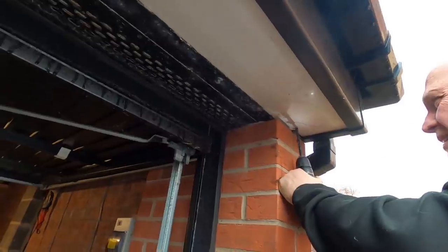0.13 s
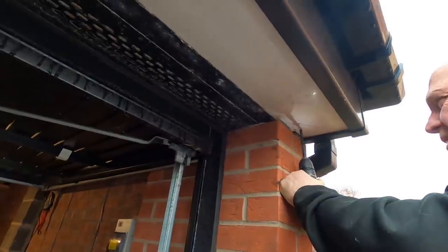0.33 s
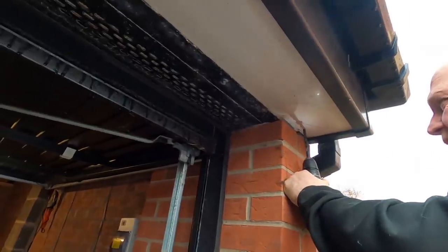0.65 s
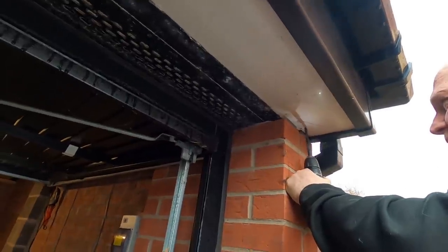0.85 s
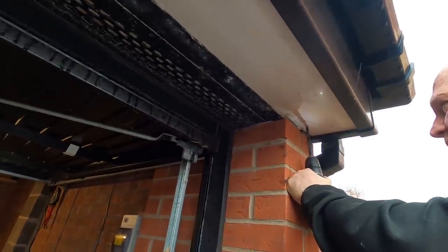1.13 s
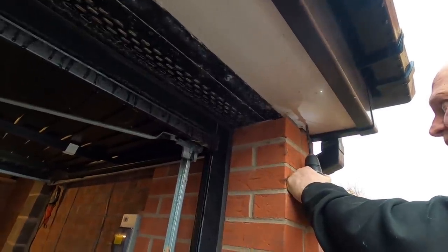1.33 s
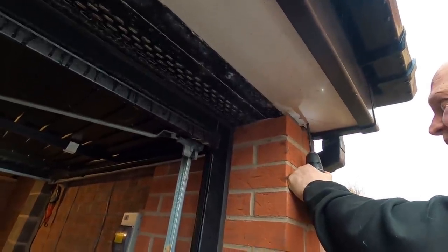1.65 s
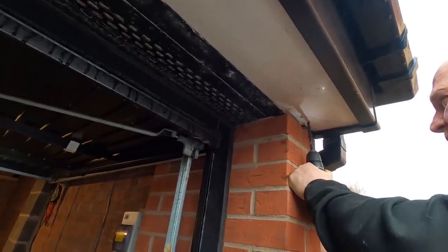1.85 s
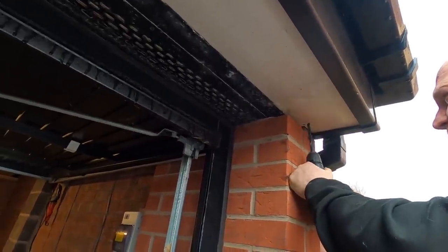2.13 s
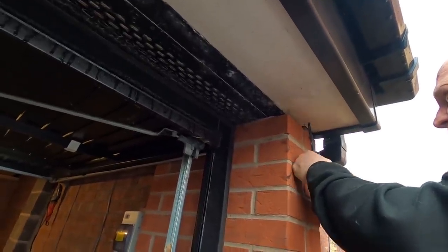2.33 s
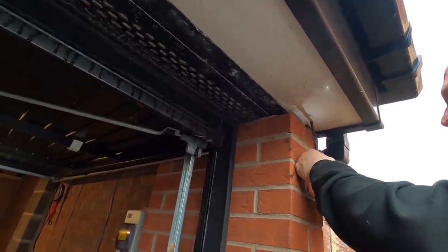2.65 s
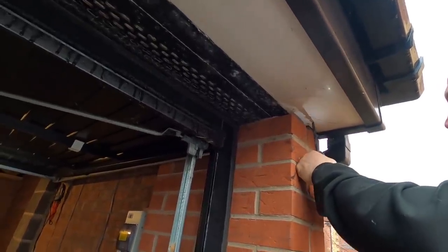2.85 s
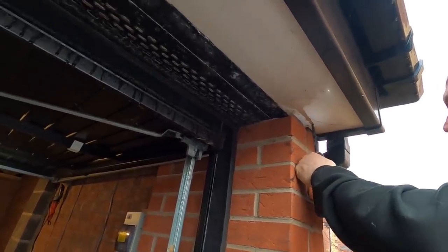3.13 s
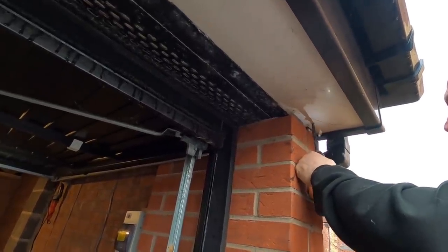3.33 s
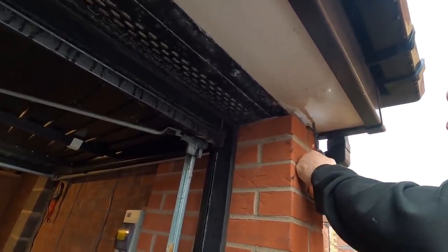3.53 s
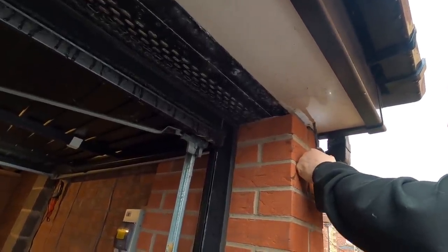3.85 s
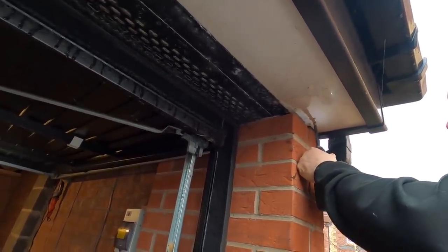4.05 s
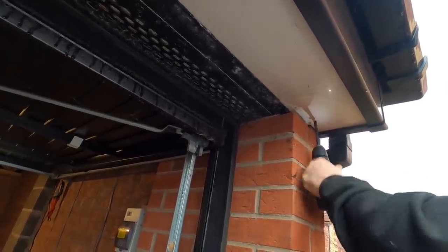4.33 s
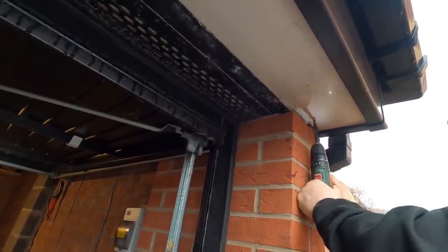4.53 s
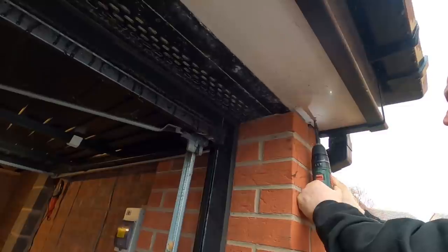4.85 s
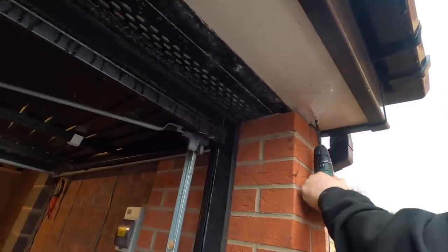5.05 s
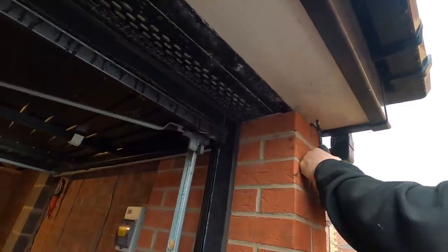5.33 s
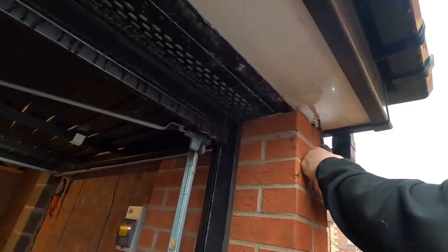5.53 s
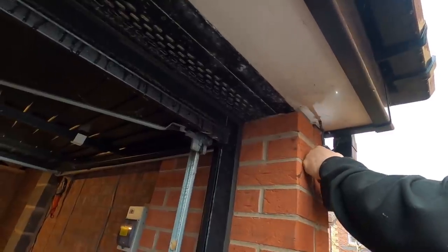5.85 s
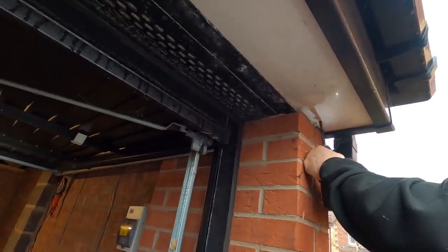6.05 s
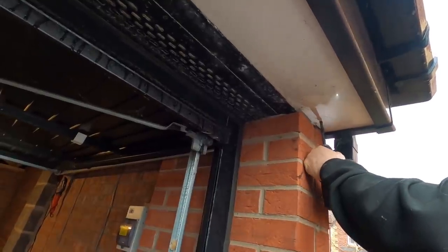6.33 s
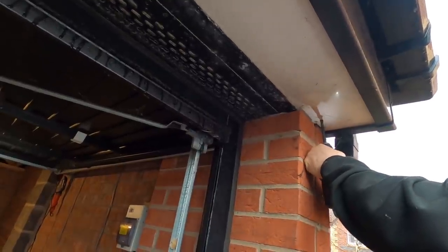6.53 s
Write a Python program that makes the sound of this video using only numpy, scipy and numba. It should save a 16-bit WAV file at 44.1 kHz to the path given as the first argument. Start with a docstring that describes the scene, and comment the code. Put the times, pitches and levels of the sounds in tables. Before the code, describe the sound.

Outdoors, about a metre from the microphone, a hammer drill coasts to a stop, leaving soft knocks, low wind and a faint distant hum. It then spins up and drills into brick three times with short breaks. Each run mixes a wavering motor whine, rapid hammering and grinding hiss, while the wall and woodwork drone. Sharp cracks of grit, dull thumps and brief squeals cut through.

```python
"""Under the eaves, about a metre away, a cordless hammer drill bores into a brick pillar. The motor whines on
shaft, pinion and commutator orders while the ratchet hammers the bit and rings the housing. Fan, brushes and
grit hiss, and forced vibration makes wall and woodwork drone. At times the gear whine chirps, an overtone of
the hammering rings, or the bit squeals and snaps. The tool thumps the wall; wind and a low hum fill the pauses."""
import sys
import numpy as np
from scipy import signal
from scipy.io import wavfile
from scipy.ndimage import uniform_filter1d
from numba import njit

SR = 44100
rng = np.random.default_rng(int(sys.argv[2]) if len(sys.argv) > 2 else 0)


def to_wav(sig):
    """Store sig (one row per channel, or 1-D mono) as 16-bit WAV at the path in sys.argv[1].

    Samples outside -1..1 are clipped; the rate is SR.
    """
    pcm = np.clip(np.atleast_2d(sig), -1, 1) * 32767
    pcm = np.round(pcm).astype(np.int16)
    wavfile.write(sys.argv[1], SR, pcm.T)  # frames by channels


N = 294924

# one table per run of the motor: (time [s], shaft speed [Hz], hiss level [dB], shaking level [dB])
MOTOR_RUNS = [
    [(0, 183, -26, -25), (0.15, 147, -31, -35.5), (0.4, 102, -37.5, -36.5), (0.5, 95, -51, -52)],
    [(1.12, 100, -60, -69), (1.2, 112, -37, -43), (1.28, 158, -23.5, -32), (1.35, 253, -22.5, -35),
     (1.45, 272, -22, -41), (1.56, 277, -22.5, -33.5), (1.6, 295, -21.5, -39), (1.64, 331.5, -18, -34),
     (1.68, 351, -21.5, -23.5), (1.71, 354.6, -22.5, -14.5), (1.77, 359.7, -25.5, -26.5),
     (1.85, 370, -23.5, -24.5), (2.1, 368, -20.5, -18), (2.17, 330, -36.5, -26), (2.33, 230, -55, -40)],
    [(2.51, 190, -62, -46), (2.55, 206, -34, -31.5), (2.61, 248.6, -23, -25), (2.7, 320, -19, -14.5),
     (2.78, 290, -24, -17.5), (2.86, 244, -27, -27), (2.98, 302, -17, -18.5), (3.1, 339, -18.5, -17),
     (3.5, 350, -20, -17.5), (3.7, 367, -19, -16.5), (3.79, 371, -28.5, -15.5), (3.98, 370, -27, -19),
     (4.15, 365, -22.5, -15.5), (4.6, 366, -20.5, -12), (4.68, 323, -21, -16), (5.0, 323, -20.5, -14.5),
     (5.07, 290, -25.5, -21), (5.13, 260, -38, -25.5), (5.3, 190, -53, -42.5)],
    [(5.48, 130, -59, -61), (5.57, 190, -30, -26.5), (5.7, 297, -20.5, -10.5), (5.77, 333, -18.5, -10),
     (5.85, 352.2, -19.5, -8.5), (5.9, 351, -18.5, -8.5), (5.95, 322.4, -21, -14.5),
     (6.0, 306.8, -21.5, -15), (6.1, 334, -21.5, -15.5), (6.3, 328, -21.5, -14.5), (6.6, 355, -21, -14.5),
     (6.69, 355, -21, -20.5)],
]
# trigger: (pulled [s], released [s])
TRIGGER = [(1.15, 2.1), (2.51, 5.02), (5.48, 6.8)]
# stages of the work, as offsets to the run's levels: (start [s], shaft [dB], commutator [dB],
# pinion [dB], ratchet [dB], extra on every second blow [dB], treble [dB], grinding [dB],
# first low mode [dB], second low mode [dB], third low mode [dB], woodwork [dB])
WORK_STAGES = [(0, -7, -18, -18, -20, 2, -6, -13, -9, 3, -1, -13),
               (1.15, -6.5, -10, -8.5, -10, 7, -3.5, -12.5, -1, -2, -4, -11.5),
               (1.56, -10, -14, -9.5, -15, -1, -2.5, -25, -8, -4, -27, -5),
               (1.7, -19, -8.5, -11.5, -6, -4.5, -1, -16, -4, -1.5, -2.5, -9),
               (2.4, -18, -23, -14.5, -15, 1, -6, -16.5, -7, -1.5, -5, -10),
               (3.03, -20.5, -16, -43, -6, -2.5, -1.5, -18.5, -5, -1, -7, -10.5),
               (3.76, -22, -10.5, -26, -5, -1.5, -1.5, -20, -4, -2, -4.5, -9.5),
               (4.2, -18, -10.5, -12, -8, -4, -1, -16, -10.5, 0.5, -11, -11.5),
               (4.65, -8, -8.5, -36, -7, 0, -1.5, -15, -5.5, -9, -9, -12),
               (5.4, -9.5, -18, -16, -10, 2, -3, -15.5, -10.5, -8, -1.5, -9.5),
               (5.91, -16, -17, -19, 3, -24, 0, -17, -8, -7, -1, -10),
               (6.44, -17, -12, -13, -6.5, 0, -0.5, -16.5, -9, -8, 3.5, -9.5)]
# resonances and noise bands, each (centre [Hz], width [Hz], level [dB])
HOUSING_MODES = [(814, 760, -6.5), (1550, 650, 1.5), (2398, 450, 0.5), (3210, 620, 8), (3840, 440, 4.5),
                 (4600, 1500, -1)]
MID_HISS_BANDS = [(1637, 1880, 3), (2420, 1060, 3), (3324, 1190, 6), (4044, 530, 1.5), (5260, 3800, 2)]
TREBLE_HISS_BANDS = [(6500, 1500, -2), (8210, 6050, 1.5), (10800, 1300, -8), (13200, 2400, -13)]
BIT_AND_CHUCK_MODES = [(4970, 120, 4.5), (6490, 540, -1), (8540, 250, -1)]
BRICK_BANDS = [(536, 313, 4), (810, 134, -1.5), (1115, 1100, 2)]
WOODWORK_MODES = [(191.8, 70, -0.5), (256.2, 53, -2.5), (320.4, 77, -5), (421, 116, -11)]
# low modes of pillar, door and eaves: (centre [Hz], width [Hz])
BUILDING_MODES = [(71, 14.7), (114, 31.6), (146, 24)]
# at 1.284 s a brief rising chirp of the gear whine as the motor spins up; at 3.08 s a steady high
# ringing overtone of the hammering; the other rows are squeals of bit and chuck: (start [s], end [s],
# first pitch [Hz], last pitch [Hz], level [dB], width [Hz], wander [Hz], fade [s], chatter [dB])
RINGING_TONES = [(1.284, 1.302, 1084, 1195, -25, 120, 15, 0.022, -3),
                 (1.72, 2.11, 1190, 1000, -24, 480, 69, 0.025, 3),
                 (3.08, 3.726, 3240, 3250, -28.5, 161.7, 23.1, .02, -1),
                 (4.45, 4.62, 6980, 7400, -25.5, 601, 77, .03, 0),
                 (4.646, 4.97, 1515, 1687, -19, 194, 19.7, 0.19, 1.9),
                 (5.18, 5.154, 9300, 9250, -44, 400, 30, 0.081, 4)]
# snaps of grit and chuck: (time [s], level [dB], centre [Hz], knock relative to crack [dB])
GRIT_SNAPS = [(1.064, -35, 6630, 9), (1.35, 4, 8460, -18), (1.6833, 2, 6750, -26), (1.6876, 4, 8300, -7),
              (1.69, 6, 8560, -26), (1.6932, 8, 8290, -12), (2.106, -10.5, 7190, 5.5),
              (2.233, -7, 8200, -10), (2.386, -34.5, 7300, 1), (2.5509, -11, 7770, 1.5),
              (2.587, -11, 7620, 4), (2.6078, 4, 10900, -11), (2.608, 14, 8000, -12.5),
              (2.651, -2, 7850, -7), (3.06, 0.5, 6600, -13), (3.7212, 3, 8090, -16),
              (3.7268, -2, 9400, -11), (3.735, -2, 8150, -23), (3.7424, 5, 8480, -24),
              (3.7492, 4.5, 8850, -11), (3.753, 1, 8200, -4), (3.7562, -5, 9560, 0), (3.763, -4, 9000, -13),
              (5.3647, -35, 7740, 5), (5.382, -28, 8000, -6), (5.501, -28, 8080, 4),
              (5.5218, -30.5, 7650, 7)]
# tool meeting wall: (time [s], level [dB], pitch [Hz], 60 dB decay [s], relative rattle [dB])
WALL_THUMPS = [(0.357, -10.5, 109, 0.19, -35), (0.522, -15, 131, 0.46, -30), (1.064, -14.5, 126, 0.07, -21),
               (1.131, -15, 106, 0.13, -39), (1.695, -4.5, 143, 0.19, -17), (2.662, -5.5, 114, 0.15, -26),
               (3.738, -3.5, 185, 0.23, -17), (3.753, -2, 138, 0.12, -8.5)]
# a low hum: (time [s], pitch [Hz], level [dB])
LOW_HUM = [(0.4, 119, -32), (0.51, 138.5, -35.5), (0.726, 117.2, -33.5), (1.092, 118, -37.5),
           (1.25, 126.4, -45)]
# its harmonics: (order [1], relative level [dB])
HUM_HARMONICS = [(1, 2), (2, -19.5), (3, -20), (5, -21), (7, -21)]
# air under the eaves: (time [s], hiss [dB], murmur [dB])
OUTDOOR_AIR = [(0.3, -43, -44.5), (1.1, -42.5, -41), (2.3, -53.5, -45.5), (6.69, -52, -46)]
# wind rumble: (time [s], level [dB])
WIND_LEVELS = [(0, -28), (1.6, -28), (4.1, -30), (5.0, -28.5), (5.9, -21), (6.69, -23)]

PINION, COMMUTATOR, RATCHET = 6.92, 12, 2.307  # events per shaft turn
COASTING_DB, FULL_SPEED_HZ, WHINE_DB_PER_OCTAVE = -22, 275, 32  # tones weaken unpowered or slow
GRIND_SLOPE, WOODWORK_SLOPE = 0.72, 0.74  # dB per dB of shaking
METAL_DB, AIR_TREBLE_DB = -15.5, -6.5  # relative to the treble hiss; to the air's hiss


def motor():
    """Rotational orders: one wavering shaft speed sets both the whine and the rate of hammering."""
    shaft_hz, level_db, _ = curves(np.vstack(MOTOR_RUNS))
    turns = np.cumsum(shaft_hz * (1 + .003 * walk(40))) / SR
    return (whine(shaft_hz, turns) + ratchet(turns)) * undb(level_db) * running()


def whine(shaft_hz, turns):
    """Periodic forces radiate tones; gear play modulates their amplitude and phase."""
    shaft_db, commutator_db, pinion_db = stages()[:3]
    powered = sum(window([[on], [off]]) for on, off in TRIGGER)
    speed_octaves = np.minimum(np.log2(shaft_hz / FULL_SPEED_HZ), 0)
    drive_db = COASTING_DB * (1 - powered) + WHINE_DB_PER_OCTAVE * speed_octaves
    tones = 0
    for order, db in ((1, shaft_db), (COMMUTATOR, commutator_db), (PINION, pinion_db)):
        amplitude = np.sqrt(2) * undb(db + drive_db + 3.5 * walk(45))
        slip_rad = .19 * order ** 0.72 * walk(120)
        tones += amplitude * np.sin(2 * np.pi * order * turns + slip_rad)
    return tones


def ratchet(turns):
    """Impulse excitation: an uneven train of blows rings the modes of the housing."""
    level_db, second_db = stages()[3:5]
    teeth = RATCHET * turns + .025 * walk(300) + 0.02 * walk(80)  # each slips a little early or late
    hit = np.flatnonzero(np.diff(np.floor(teeth)) > 0)
    every_second = np.floor(teeth[hit]) % 2
    strength = undb(2.0 * rng.standard_normal(N)[hit] + second_db[hit] * every_second)
    share = (teeth[hit + 1] % 1) / (teeth[hit + 1] - teeth[hit])  # a blow falls between two samples
    blows = np.zeros(N)
    blows[hit] += strength * share
    blows[hit + 1] += strength * (1 - share)
    housing = sum((-1) ** k * undb(db + 2.5 * walk(40)) * ring(blows, hz, width)
                  for k, (hz, width, db) in enumerate(HOUSING_MODES))
    return unit(housing) * undb(level_db)


def hiss():
    """Broadband noise of fan, brushes, grit and outdoor air, amplitude-modulated by the bit's wobble."""
    _, level_db, shake_db = curves(np.vstack(MOTOR_RUNS))
    air_db, murmur_db = curves(OUTDOOR_AIR)
    treble_db, grind_db = stages()[5:7]
    wobble = undb(0.43 * walk(24.91) + 0.88 * walk(150))
    grit = undb(0.31 * walk(990))
    middle = power_sum(level_db, air_db) * bands(MID_HISS_BANDS, 0.71, 20)
    treble = bands(TREBLE_HISS_BANDS, 1.0, 24) + undb(METAL_DB) * bands(BIT_AND_CHUCK_MODES, 3.0, 12)
    treble *= grit * power_sum(level_db + treble_db, air_db + AIR_TREBLE_DB)
    grinding = power_sum(grind_db + GRIND_SLOPE * shake_db, murmur_db) * bands(BRICK_BANDS, 0.78, 13)
    return wobble * (middle + treble + grinding)


def drone():
    """Forced vibration: the shaking tool drives modes of wall and woodwork above the outdoor murmur."""
    shake_db = curves(np.vstack(MOTOR_RUNS))[2]
    murmur_db = curves(OUTDOOR_AIR)[1]
    *mode_db, wood_db = stages()[7:]
    low = sum(power_sum(shake_db + db, murmur_db) * bands([(hz, width, 0)], 1.52, 8.1)
              for (hz, width), db in zip(BUILDING_MODES, mode_db))
    wood_gain = power_sum(wood_db + WOODWORK_SLOPE * shake_db, murmur_db)
    return low + wood_gain * bands(WOODWORK_MODES, 2.54, 13)


def ringing_tones():
    """Resonance: a narrow, wandering band sounds the gear chirp, hammering overtone and bit squeals."""
    rasp_hz = 38 + 3 * walk(10)
    rasp = 1 + .4 * np.sin(2 * np.pi * np.cumsum(rasp_hz) / SR)
    out = np.zeros(N)
    for start, end, first_hz, last_hz, db, width, wander, fade, chatter_db in RINGING_TONES:
        glide = [(start, first_hz, db), (end, last_hz, db), (end + fade, last_hz, db - 21.5)]
        hz, level_db = curves(glide)
        tone = ring(rng.standard_normal(N), hz + wander * walk(22), width)
        tone /= np.sqrt(uniform_filter1d(tone ** 2, int(SR / 25)))  # evens out the level
        out += tone * rasp * undb(level_db + chatter_db * walk(40)) * window(glide, fade_s=0.012)
    return out


def snaps():
    """Impact transients: grit and chuck give a brief crack and a longer knock of the housing."""
    out, t = np.zeros(N), np.arange(SR // 4) / SR
    crack_t60_s, knock_t60_s = .007, .017
    attack = np.minimum(t / 0.000098, 1)
    for start, db, hz, knock_db in GRIT_SNAPS:
        noise = rng.standard_normal(len(t))  # reversed after filtering, to start at full strength
        crack = unit(ring(noise, hz, .45 * hz))[::-1] + undb(-10) * noise
        crack *= undb(-60 * t / crack_t60_s)
        knock = undb(knock_db - 60 * t / knock_t60_s) * unit(ring(noise, hz=2350, width=2800))[::-1]
        add(out, start, undb(db - 3.5) * (crack + knock) * attack)
    return out


def thumps():
    """Damped free vibration: the tool meets the wall and rings one low mode with a dull rattle."""
    out, t = np.zeros(N), np.arange(SR // 4) / SR
    attack = np.minimum(t / 0.002, 1)
    for start, db, hz, t60, rattle_db in WALL_THUMPS:
        mode = undb(-60 * t / t60) * np.sin(2 * np.pi * hz * t)
        rattle = unit(ring(rng.standard_normal(len(t)), hz=455, width=550))
        rattle *= undb(rattle_db - 60 * t / 0.18)
        add(out, start, undb(db) * (mode + rattle) * attack)
    return out


def low_hum():
    """Harmonic series: a low hum sounds a wavering fundamental with weak overtones."""
    hz, level_db = curves(LOW_HUM)
    phase = 2 * np.pi * np.cumsum(hz) / SR
    harmonics = sum(undb(db + 3.7 * walk(20.5)) * np.sin(order * phase) for order, db in HUM_HARMONICS)
    return np.sqrt(2) * undb(level_db) * window(LOW_HUM) * harmonics


def wind():
    """Random pressure fluctuation: wind rumbles at the lower limit of hearing."""
    rumble = bands([(12.4, 17.6, 16), (35.2, 6.2, -8)], flicker_db=1.5, rate_hz=5.1)
    return undb(curves(WIND_LEVELS)[0]) * rumble


def stages(change_s=0.028):
    """A moving average softens the steps in each column of the work stages."""
    starts, *columns = np.transpose(WORK_STAGES)
    current = np.searchsorted(starts, np.arange(N) / SR, side="right") - 1
    return [uniform_filter1d(column[current], int(change_s * SR)) for column in columns]


def running():
    """Gate: 1 while the motor turns."""
    return np.clip(sum(window(run) for run in MOTOR_RUNS), 0, 1)


def power_sum(tool_db, floor_db):
    """Incoherent sources add in power: the joint amplitude of running tool and background."""
    return np.hypot(running() * undb(tool_db), undb(floor_db))


def undb(db):
    """Decibels to amplitude ratio."""
    return 10 ** (np.asarray(db) / 20)


def unit(x):
    """Normalisation to rms 1."""
    return x / np.sqrt(np.mean(x ** 2))


def curves(table):
    """Linear interpolation of each column over the times in the first."""
    times, *columns = np.transpose(table)
    return [np.interp(np.arange(N) / SR, times, column) for column in columns]


def window(table, fade_s=0.019):
    """Trapezoidal envelope: 1 while a table lasts."""
    start, end = table[0][0], table[-1][0]
    return np.interp(np.arange(N) / SR, [start - fade_s, start, end, end + fade_s], [0, 1, 1, 0])


@njit
def bandpass(x, hz, width):
    """Second-order resonance in state-variable form, with gain 1 at its moving centre."""
    y, band_state, low_state = np.empty(len(x)), 0., 0.
    for i in range(len(x)):
        tuning, damping = np.tan(np.pi * hz[i] / SR), width / hz[i]
        band = (band_state + tuning * (x[i] - low_state)) / (1 + tuning * (tuning + damping))
        band_state = 2 * band - band_state
        low_state += 2 * tuning * band
        y[i] = damping * band
    return y


def ring(x, hz, width):
    """Two equal resonances in cascade give steep skirts."""
    hz = np.clip(hz + np.zeros(len(x)), 10, .45 * SR)
    return bandpass(bandpass(x, hz, float(width)), hz, float(width))


def walk(rate_hz):
    """Slow random modulation: held random levels, smoothed twice; rms 1."""
    hold = int(SR / rate_hz)
    steps = np.repeat(rng.standard_normal(N // hold + 1), hold)
    return unit(uniform_filter1d(uniform_filter1d(steps, hold), hold)[:N])


def bands(modes, flicker_db, rate_hz):
    """Random excitation of resonances, each flickering independently; rms 1."""
    out = 0
    for hz, width, db in modes:
        gain = undb(db + flicker_db * walk(rate_hz)) * np.sqrt(width)
        out += gain * unit(ring(rng.standard_normal(N), hz, width))
    return unit(out)


def add(out, start_s, sound):
    """Superpose a short sound at its start time."""
    i = int(start_s * SR)
    out[i:i + len(sound)] += sound[:len(out) - i]


def scene():
    """Superposition: all sources sum at one microphone, which feeds both channels."""
    mono = motor() + hiss() + drone() + wind() + ringing_tones() + snaps() + thumps() + low_hum()
    return np.array([mono, mono])


def record(dry):
    """Soft saturation rounds the loudest peaks, and a steep low-pass cuts above 16 kHz."""
    lowpass = signal.ellip(10, .2, 85, 16000, fs=SR, output="sos")
    return signal.sosfilt(lowpass, np.tanh(0.84 * dry) / 0.97)


dry = scene()
out = record(dry)
to_wav(out)
```